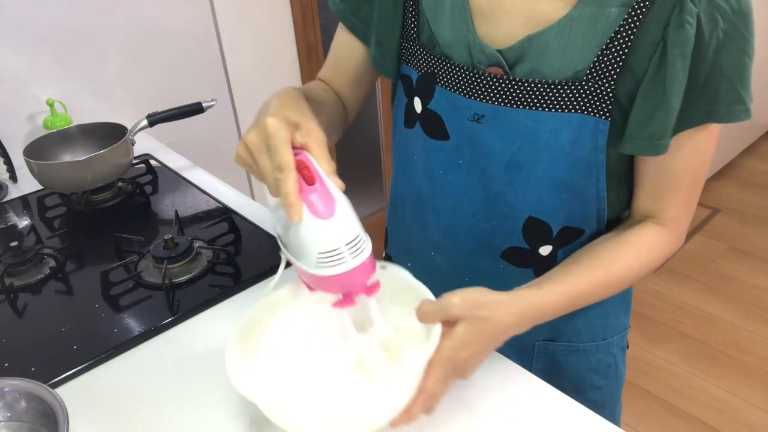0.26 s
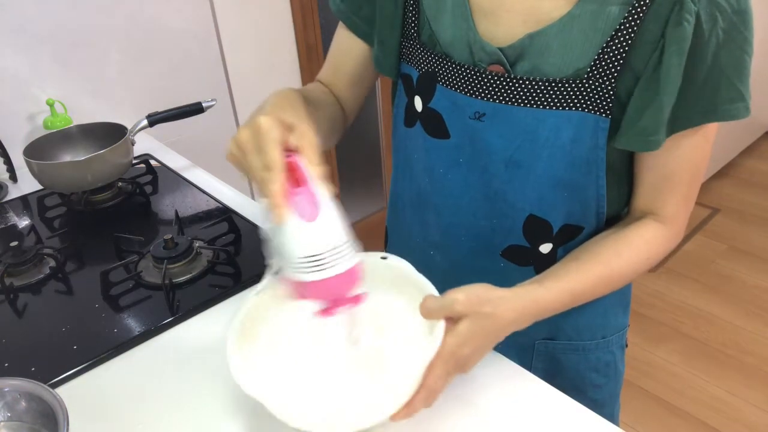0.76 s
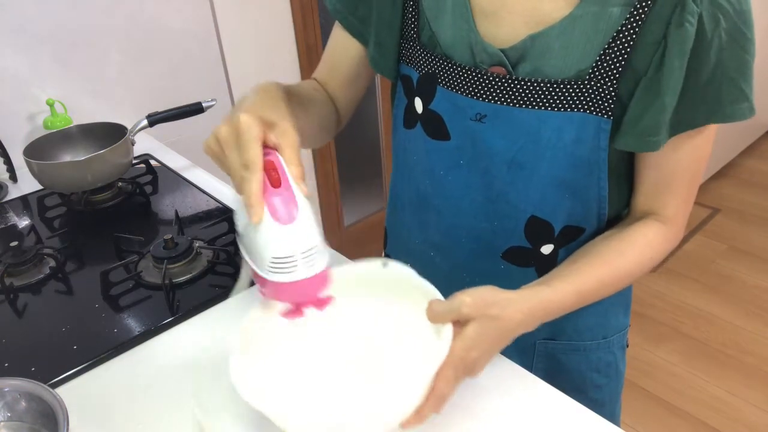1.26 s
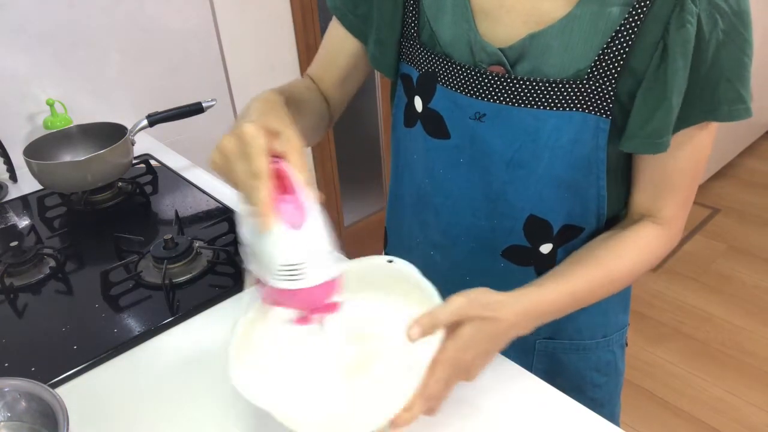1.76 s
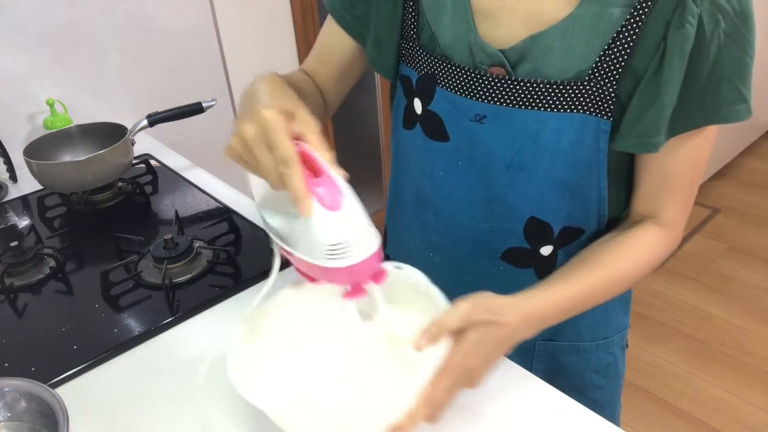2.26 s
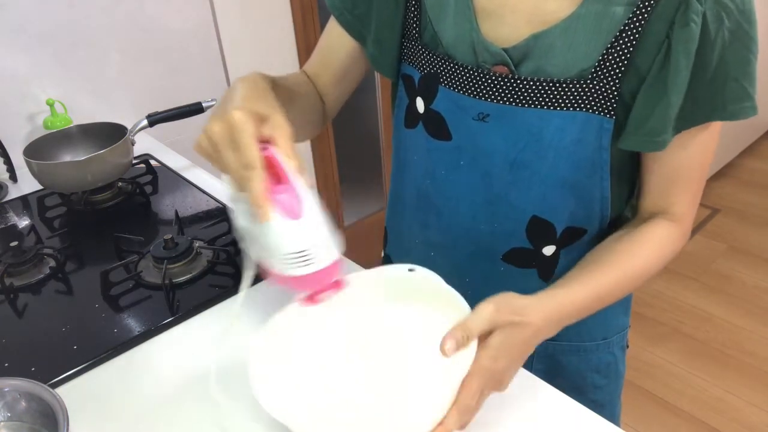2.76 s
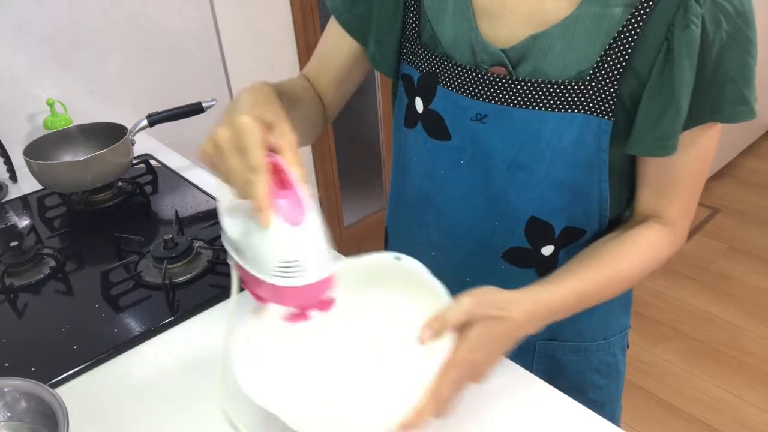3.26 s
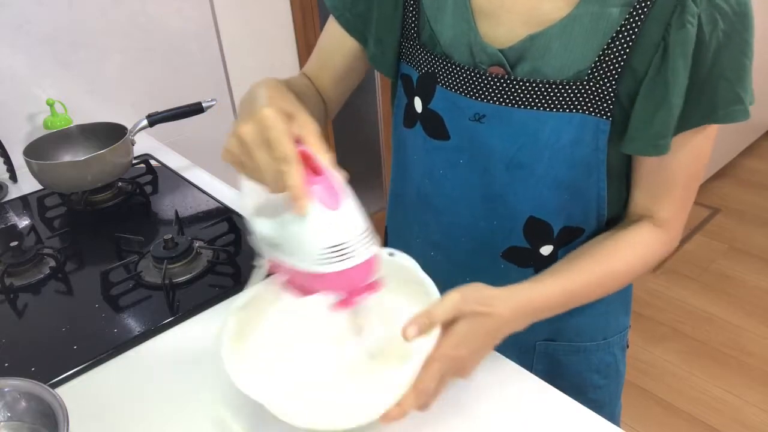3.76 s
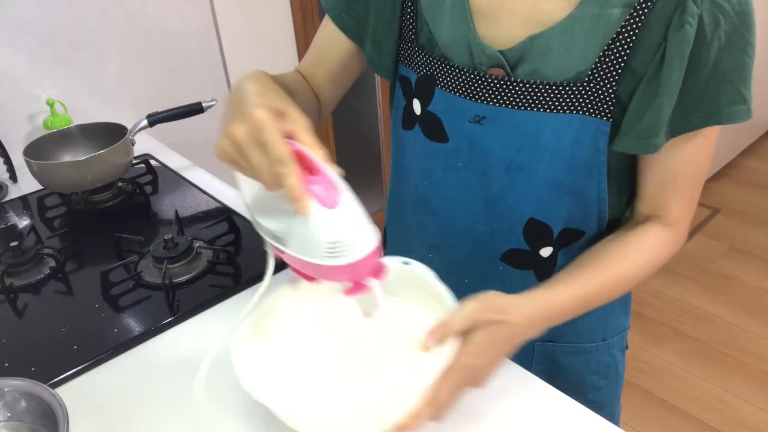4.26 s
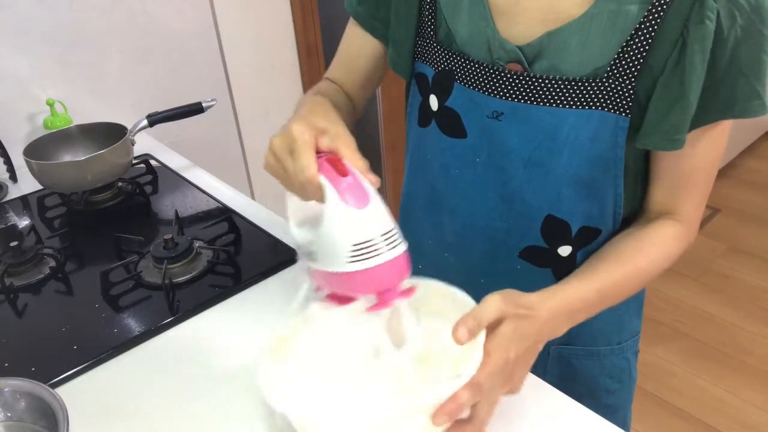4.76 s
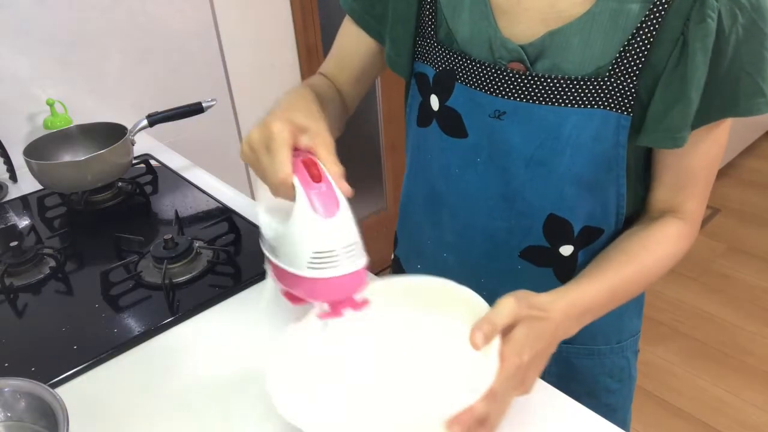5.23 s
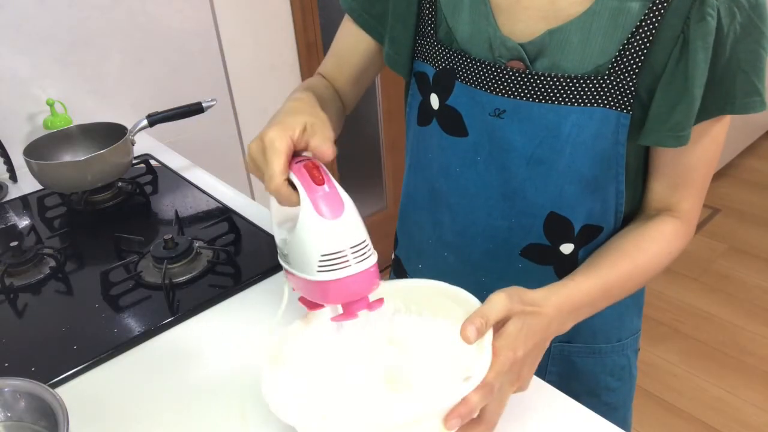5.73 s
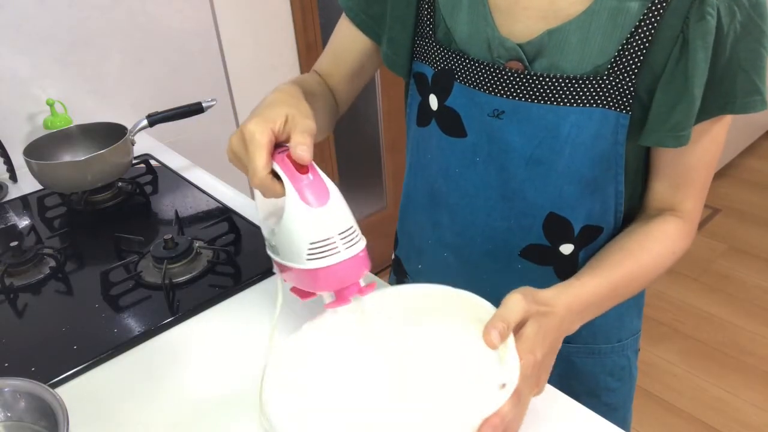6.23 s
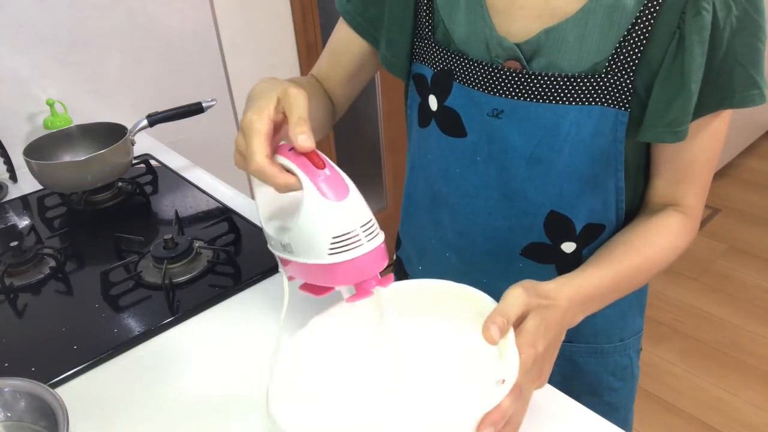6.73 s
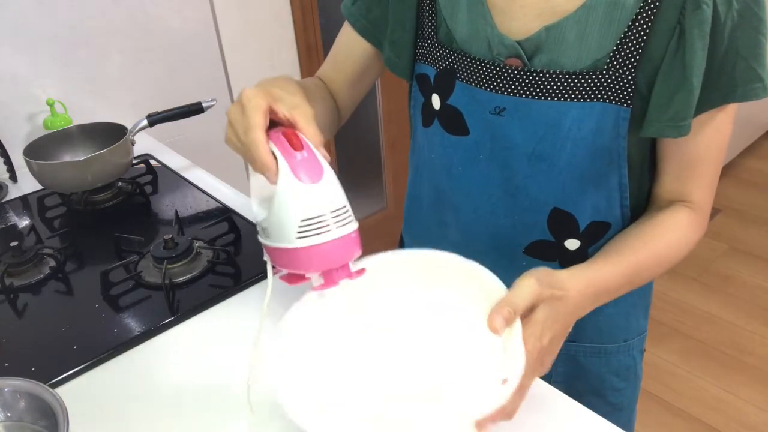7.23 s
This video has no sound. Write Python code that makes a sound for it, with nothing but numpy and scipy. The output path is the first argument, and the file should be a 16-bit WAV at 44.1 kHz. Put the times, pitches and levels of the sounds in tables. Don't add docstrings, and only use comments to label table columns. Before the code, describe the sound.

In a small kitchen, an electric hand mixer runs in a plastic bowl of cream. At first it is quiet and double-speed, shrill and hissy, pulsing with rapid stirring and light ticks. After a tiny dip it turns much louder, at natural speed, with a rough roar, whine, beater knocks and bowl bumps. A slider clicks off and the pitch glides down amid slowing rattles. Close microphone, about a metre, short room reflections.

```python
import sys
import numpy as np
from scipy import signal
from scipy.fft import rfft, irfft, next_fast_len
from scipy.io import wavfile
from scipy.ndimage import uniform_filter1d

SR = 44100
rng = np.random.default_rng(int(sys.argv[2]) if len(sys.argv) > 2 else 0)


def wav_record(signal):
    frames = np.transpose(np.atleast_2d(signal))
    bounded = np.clip(frames, -1, 1)
    quanta = np.round(bounded * 32767).astype(np.int16)
    wavfile.write(sys.argv[1], SR, quanta)


def natural_amplitude(level_db):
    exponent = np.asarray(level_db, float) / 20
    return 10 ** exponent


N = 330309
SWITCH_OFF_S = 6.575
SHAFT_TURNS_PER_KNOCK = 5
STIR_S = 0.1558


# (time [s], speed [Hz])
FAST_SHAFT = [(0.2, 722.7), (1.25, 718.3), (1.75, 719.1), (2.25, 711.8), (2.75, 708.6), (3.75, 708.3),
              (4.5, 705.3)]
# (time [s], turn [0-1])
FAST_TURN = [
    (1.85, 0.0),
    (2.3, 0.6),
]
FAST_ORDERS = (1, 5, 9, 12, 6, 7, 18)
# (rms level [dB], gain when turned [dB], gain per % of speed won [dB],
# loss without current [dB], loss per octave of coasting [dB])
FAST_WHINES = [(-57.5, -1.5, 0, 0, 0), (-39.5, -11, 0, 0, 0), (-38.5, -7.5, 0, 0, -3), (-39.5, -4, 0, 0, 2),
               (-46.5, 0, 0, 0, 0), (-41.5, -22, 0, 0, 0), (-49, -3, 0, 0, 0)]
# (level [dB], bass [dB], treble re level [dB], beater rattle re level [dB])
FAST_ROAR = (-25.5, -43.5, -9.5, -9.5)
# (time [s], swell of the roar [dB])
FAST_PRESS = [
    (0.1, 0.24),
    (2.2, 0.5),
    (4.2, 0.75),
]
# (time [s], peak level [dB], ring [Hz])
FAST_KNOCKS = [(1.255, -10, 5190), (1.86, -15, 5020), (2.091, -8, 4230), (2.309, -11, 5050),
               (2.931, -11, 2580), (3.0708, -2.5, 5060), (3.078, -5, 5410), (3.3802, -11, 5180),
               (3.5264, -12, 5210), (3.691, -9, 3770), (3.7672, -8, 5020), (4.0018, -5.5, 5100),
               (4.1508, -11, 5200), (4.306, -16, 6710), (4.3137, -6, 3240), (4.3904, -17, 6740)]


def fast_mixer(swell_db):
    return mixer(FAST_SHAFT, FAST_TURN, FAST_ORDERS, FAST_WHINES, FAST_ROAR, FAST_PRESS, FAST_KNOCKS,
                 pace=2, swell_db=swell_db, stir_db=3.5)


# (time [s], speed [Hz])
SLOW_SHAFT = [(4.45, 344.1), (5.2, 345.3), (5.5, 346.1), (6.4, 350), (6.578, 349.2), (6.68, 324),
              (6.92, 260.9), (7.1, 219.7), (7.28, 179), (7.49, 133.5)]
# (time [s], turn [0-1])
SLOW_TURN = [
    (5.35, 0.073),
    (5.7, 0.95),
    (5.95, 0.95),
    (6.15, 0.02),
    (6.4, 0.23),
]
SLOW_ORDERS = (1, 5, 9, 12, 18, 24, 36, 48, 72)
# (rms level [dB], gain when turned [dB], gain per % of speed won [dB],
# loss without current [dB], loss per octave of coasting [dB])
SLOW_WHINES = [(-50.5, -1, 1, 3, 3), (-29.5, 6.5, 0, 16, 0.1), (-28.5, -5.5, 1, 2, 4.3),
               (-21, -9.5, 0.5, 11, 9), (-35.5, 6, 0, 6, 9), (-43, 2, 5, 9, 2.5), (-41, -1, 5, 14, 6),
               (-46, 0, -1, 0.1, 9), (-53, 0, 0, 0.1, 8)]
# (level [dB], bass [dB], treble re level [dB], beater rattle re level [dB])
SLOW_ROAR = (-12, -31.5, -8.5, -7.5)
# (time [s], swell of the roar [dB])
SLOW_PRESS = [(4.6, 0.4), (4.74, 0.9), (4.85, -0.7), (5.03, 3), (5.14, -1.5), (5.34, 3), (5.5, -1.4),
              (5.64, 0.5), (5.84, 0.6), (6.3, 0.4), (6.45, 1), (6.72, -0.1), (6.82, -0.4), (7.0, 1),
              (7.17, 2.5), (7.35, 0.8), (7.45, 2.5)]
# (time [s], peak level [dB], ring [Hz])
SLOW_KNOCKS = [(4.642, -8, 1320), (4.976, -1, 1340), (5.001, 0, 1380), (5.015, 1, 1500), (5.023, 6, 1310),
               (5.081, 0.5, 1060), (5.224, -5, 826), (5.372, 6, 1350), (5.456, -6, 1310), (6.71, -4, 1410),
               (6.79, -7, 1490), (6.828, 0, 1420), (6.866, -0.5, 1730), (6.884, -4, 1380),
               (6.901, -2, 1360), (6.94, -11, 1280), (7.003, 0, 1570), (7.08, -2.5, 1590),
               (7.092, -6, 1490), (7.115, -8, 980), (7.144, -6, 1050), (7.163, -9, 953),
               (7.1855, 2.5, 1500), (7.2105, -2, 1700), (7.24, -5, 1560), (7.326, -5.5, 867),
               (7.351, -11, 856), (7.379, -5.5, 900), (7.41, -8, 1230), (7.443, -11, 1240)]


def slow_mixer():
    return mixer(SLOW_SHAFT, SLOW_TURN, SLOW_ORDERS, SLOW_WHINES, SLOW_ROAR, SLOW_PRESS, SLOW_KNOCKS, pace=0.99)


# (level [dB], bass [dB], treble [dB])
COAST_LOSS = (9, 13, 6)


def mixer(shaft, turn, orders, whines, roar, press, hits, pace, swell_db=0, stir_db=0):
    (shaft_hz,), (turned,), (press_db,) = curves(shaft), curves(turn), curves(press)
    turns = np.cumsum(shaft_hz) / SR
    octaves = np.log2(shaft_hz / shaft_hz.max())
    level_db, bass_db, treble_db = (db + loss * octaves for db, loss in zip(roar, COAST_LOSS))
    level_db = level_db + press_db

    rattle_db = roar[-1] + 2.4 * press_db + 2.6 * walk(3.05) + 11 * octaves
    air = natural_amplitude(0.27 * walk(9 * pace)) * rng.standard_normal(N)
    drive = (air + natural_amplitude(rattle_db) * rattle(turns, pace)) / np.hypot(1, natural_amplitude(rattle_db))
    heard = kitchen(body(drive, pace), pace, wet_db=-10.5)
    bass, lower, upper, treble = split(heard, pace, flutter_db=0.86)
    upper = upper * natural_amplitude(7 * octaves)
    noise = natural_amplitude(level_db + swell_db + 0.5) * (lower + upper + natural_amplitude(treble_db) * treble)

    leads = lead_levels(shaft_hz, orders, whines, turned, pace)
    tones = whine(turns, leads, level_db, pace, stir_db)
    return noise + natural_amplitude(bass_db) * bass + tones + knocks(hits, pace)


def rattle(turns, pace):
    passes = np.flatnonzero(np.diff(np.floor(turns / SHAFT_TURNS_PER_KNOCK)))
    late, size = rng.standard_normal((N // 100, 2))[:len(passes)].T
    jitter = (0.0026 * SR / pace * late).astype(int)
    blows = np.zeros(N)
    blows[np.clip(passes + jitter, 0, N - 1)] = natural_amplitude(3.0 * np.clip(size, -2, 2))
    t = np.arange(SR // 20) / SR
    envelope = signal.fftconvolve(blows, np.exp(-t * pace / 0.0038))[:N]
    return unit(envelope * rng.standard_normal(N))


# (frequency [Hz], density [dB per Hz])
COLOUR = [(15, -55), (25, -30), (174, -16), (240, -13), (483, -12), (667, -5), (784, -2.5), (1850, -1.5),
          (2070, 2), (2560, -2), (2930, -2.5), (4510, -2), (15600, -21.5)]
BODY_HZ = (64, 155, 242, 300, 370, 420, 672, 760, 1050, 1285, 1550, 1870, 2050, 2350, 2550, 2610, 2950,
           3350, 3800, 4350, 4950, 5300, 6250, 8000, 8600, 10400)
# (width [Hz], gain [dB])
BODY_SHAPE = [(22, 10), (21, 5), (39.7, 11), (27, 4), (36, -4), (43.2, 5), (52.6, 11.5), (43.2, -3),
              (70, 2.5), (94, 7.5), (55.556, 4), (118.8, 6.5), (74.074, -8.5), (99, 3.5), (55, 7.5),
              (69.6, 8), (150, -1), (216, 6), (130, 2), (336, 2.5), (197, -8.5), (180, 1), (160, 3.5),
              (185.19, -4), (330, 2), (756, -7)]


def body(x, pace):
    hz = np.maximum(np.fft.rfftfreq(8192, 1 / SR) / pace, 1)
    colour_hz, colour_db = np.transpose(COLOUR)
    db = np.interp(np.log(hz), np.log(colour_hz), colour_db)
    for centre, (width, gain) in zip(BODY_HZ, BODY_SHAPE):
        db = db + gain / (1 + (2 * (hz - centre) / width) ** 2)
    cepstrum = irfft(np.log(natural_amplitude(db)))
    cepstrum[1:4096] *= 2
    cepstrum[4097:] = 0
    return signal.fftconvolve(x, irfft(np.exp(rfft(cepstrum))))[:N]


BAND_EDGES = (500, 800, 1150, 1600, 2200, 3000, 3900, 5000, 7500)


def split(x, pace, flutter_db):
    size = next_fast_len(N)
    spectrum, hz = rfft(x, size), np.fft.rfftfreq(size, 1 / SR)
    below = [0] + [1 / (1 + (hz / (edge * pace)) ** 12) for edge in BAND_EDGES] + [1]
    bands = []
    for a, b in zip(below, below[1:]):
        bands.append(irfft(spectrum * (b - a), size)[:N] * natural_amplitude(flutter_db * walk(9 * pace)))
    lower, upper = sum(bands[1:5]), sum(bands[5:8])
    middle = np.sqrt(np.mean((lower + upper) ** 2))
    return unit(bands[0]), lower / middle, upper / middle, unit(sum(bands[8:]))


# (multiple of the shaft [1], level re the roar [dB])
SIDE_ORDERS = [(3, -26), (4, -22), (8, -23), (10, -21), (11, -34)]


def whine(turns, leads, roar_db, pace, stir_db):
    levels = list(leads)
    for k, db in SIDE_ORDERS:
        levels.append((k, roar_db + db + 2.0 * walk(3 * pace)))
    stir = 2 * np.pi * np.arange(N) / SR / STIR_S
    throb = np.pi * turns / SHAFT_TURNS_PER_KNOCK
    out = np.zeros(N)
    for k, db in levels:
        level_db = db + 1.6 * walk(14 * pace) + 1.0 * np.sin(throb + k) + stir_db * np.sin(stir + k)
        out += np.sqrt(2) * natural_amplitude(level_db) * np.sin(2 * np.pi * k * turns + 0.33 * walk(25 * pace))
    return out


def lead_levels(shaft_hz, orders, whines, turn, pace):
    off = np.clip((np.arange(N) / SR - SWITCH_OFF_S) / 0.04, 0, 1)
    octaves = np.log2(shaft_hz / shaft_hz.max())
    won = 100 * (np.maximum.accumulate(shaft_hz) / shaft_hz[0] - 1)
    leads = []
    for k, (db, turn_db, won_db, off_db, octave_db) in zip(orders, whines):
        running_db = db + turn_db * turn + won_db * won + octave_db * octaves
        loss_db = off * (off_db - glide_db(k * shaft_hz / pace))
        leads.append((k, running_db - loss_db + 1.6 * walk(4 * pace)))
    return leads


# (centre [Hz], width [Hz], gain [dB])
WHINE_PEAKS = [(1950, 250, 9), (2340, 260, 15), (2650, 150, 6), (3900, 170, 13), (4400, 500, 7),
               (5260, 200, 8), (3150, 500, -8), (6200, 500, 6), (9200, 900, 9), (13300, 1500, 5)]


def glide_db(hz):
    return sum(db / (1 + (2 * (hz - f) / w) ** 2) for f, w, db in WHINE_PEAKS)


def knocks(table, pace):
    out, t = np.zeros(N), np.arange(SR // 20) / SR
    click = body(1.0 * (t == 0), pace)[:len(t)]
    for s, db, hz in table:
        add(out, s, natural_amplitude(db - 5) * ring(hz, 0.012 / pace))
        add(out, s, natural_amplitude(db - 1.5) * click / np.abs(click).max())
        scrape = unit(body(rng.standard_normal(len(t)), pace)[:len(t)])
        add(out, s, natural_amplitude(db - 17.5) * scrape * np.exp(-t * pace / 0.0033))
        spit = np.diff(rng.standard_normal(len(t) + 1)) * np.exp(-t * pace / 0.005)
        add(out, s, (s < SWITCH_OFF_S) * natural_amplitude(2.4 * db - 30) * spit)
    return kitchen(out, pace, wet_db=-11)


# (first [s], period [s], strokes [1])
STIRS = [
    (0.267, 0.1558, 9),
    (1.712, 0.1533, 18),
]
# (swell [dB], bowl boom [dB], counter boom [dB])
STROKES = [
    (1.1, -53, -56),
    (2.4, -43.5, -52.5),
]


def sweeps():
    swell_db, boom, t = np.zeros(N), np.zeros(N), np.arange(int(0.06 * SR)) / SR
    hump = np.hanning(len(t))
    bowl_tone = hump * np.sin(2 * np.pi * 825 * t)
    counter_tone = hump * np.sin(2 * np.pi * 118 * t)
    for (first, period, strokes), (db, bowl_db, counter_db) in zip(STIRS, STROKES):
        scatter_db = 3.5 * rng.standard_normal((strokes, 2))
        starts = first + period * np.arange(strokes) - t[-1] / 2
        for s, (bowl, counter) in zip(starts, scatter_db):
            add(swell_db, s, db * hump)
            add(boom, s, natural_amplitude(bowl_db + bowl) * bowl_tone)
            add(boom, s - 0.0522, natural_amplitude(counter_db + counter) * counter_tone)
    return swell_db, boom


def slaps():
    t = np.arange(N) / SR
    first_s, last_s = 0.02, 1.9
    gate = np.maximum(np.cos(2 * np.pi * (t - first_s) / STIR_S), 0) ** 6 * (t < last_s)
    band = signal.butter(2, (1500, 2500), "band", fs=SR, output="sos")
    return natural_amplitude(-32 + 1.0 * walk(5.6)) * gate * unit(signal.sosfilt(band, rng.standard_normal(N)))


# (time [s], peak level [dB])
SWITCH = [
    (6.5669, 8),
    (6.6067, 7),
    (6.649, -1.5),
]
# (frequency [Hz], level [dB], t60 [s])
SWITCH_MODES = [(5170, -5, .012), (6350, -1.5, 0.024), (7250, -1, 0.029), (8700, -8, .015),
                (11300, -5, .02), (13050, 0, .015), (15000, -9, .01)]


def switch():
    out, t = np.zeros(N), np.arange(SR // 20) / SR
    for s, db in SWITCH:
        for hz, mode_db, t60 in SWITCH_MODES:
            add(out, s, natural_amplitude(db + mode_db - 11 + 3 * rng.standard_normal()) * ring(hz, t60))
        scrape = np.diff(rng.standard_normal(len(t) + 1))
        add(out, s, natural_amplitude(db - 11.5) * scrape * np.exp(-t / 0.0035))
        jolt = unit(body(rng.standard_normal(len(t)), 0.94)[:len(t)])
        add(out, s, natural_amplitude(db - 23) * jolt * np.exp(-t / 0.008))
    return kitchen(out, 0.93, wet_db=-10)


# (time [s], peak level [dB], frequency [Hz], t60 [s])
THUMPS = [
    (4.69, -32, 70, .08),
    (4.795, -12, 130, .04),
    (4.99, -27, 60, .15),
    (5.144, -11, 120, .04),
    (5.35, -28, 60, .15),
    (7.286, -16, 115, .05),
]


def thumps():
    out = np.zeros(N)
    for s, db, hz, t60 in THUMPS:
        bump = ring(hz, t60)
        onset = np.minimum(np.arange(len(bump)) * hz / SR, 1)
        add(out, s, natural_amplitude(db) * bump * onset)
    return out


# (time [s], frequency [Hz], rms level [dB])
VEHICLE = [
    (0.3, 98, -64),
    (0.39, 116, -66),
    (0.496, 126, -52),
    (0.7, 140.5, -55),
    (0.886, 140.5, -53),
    (1.1, 139, -64),
    (1.3, 137, -62),
]


def vehicle():
    hz, db = curves(VEHICLE)
    t = np.arange(N) / SR
    gate = np.clip(np.minimum(t - VEHICLE[0][0], VEHICLE[-1][0] - t) / 0.08, 0, 1)
    return np.sqrt(2) * gate * natural_amplitude(db) * np.sin(2 * np.pi * np.cumsum(hz) / SR)


RUMBLE_BAND = (45, 85.5)


def rumble():
    band = signal.butter(2, RUMBLE_BAND, "band", fs=SR, output="sos")
    return natural_amplitude(-50.5) * unit(signal.sosfilt(band, rng.standard_normal(N)))


def kitchen(x, pace, wet_db):
    t60_s, gap_s = 0.1, 0.003
    t = np.arange(SR // 2) / SR
    tail = rng.standard_normal(len(t)) * 1000 ** (-t * pace / t60_s) * (t * pace > gap_s)
    wet = signal.fftconvolve(x, tail / np.sqrt(np.sum(tail ** 2)))[:N]
    return (x + natural_amplitude(wet_db) * wet) / np.hypot(1, natural_amplitude(wet_db))


def low_cut(x, pace):
    return signal.sosfilt(signal.butter(4, 52 * pace, "high", fs=SR, output="sos"), x)


def unit(x):
    return x / np.sqrt(np.mean(x ** 2))


def curves(table):
    s, *columns = np.transpose(table)
    return [np.interp(np.arange(N) / SR, s, c) for c in columns]


def walk(rate):
    hold, steps = int(SR / rate) // 32, N // 32 + 1
    coarse = np.repeat(rng.standard_normal(steps // hold + 1), hold)
    coarse = uniform_filter1d(uniform_filter1d(coarse, hold), hold)
    return unit(np.interp(np.arange(N) / 32, np.arange(len(coarse)), coarse))


def ring(hz, t60):
    t = np.arange(int(t60 * SR)) / SR
    return np.sin(2 * np.pi * hz * t) * 1000 ** (-t / t60)


def add(out, s, sound):
    i = int(s * SR)
    out[i:i + len(sound)] += sound[:N - i]


def scene():
    t = np.arange(N) / SR
    cut_s, fade_out_s, fade_in_s = 4.475, 0.035, 0.115
    swell_db, boom = sweeps()
    fast = low_cut(fast_mixer(swell_db) + boom + slaps() + vehicle(), 1.9)
    slow = low_cut(slow_mixer() + switch() + rumble(), 0.95) + thumps()
    mono = fast * np.clip((cut_s - t) / fade_out_s, 0, 1) + slow * np.clip((t - cut_s) / fade_in_s, 0, 1)
    return np.array([mono, mono])


def top_cut(x):
    return signal.sosfilt(signal.butter(12, 15700, fs=SR, output="sos"), x)


def record(dry):
    mix = np.clip(dry, -0.98, 0.98)
    return top_cut(mix)


dry = scene()
out = record(dry)
wav_record(out)
```